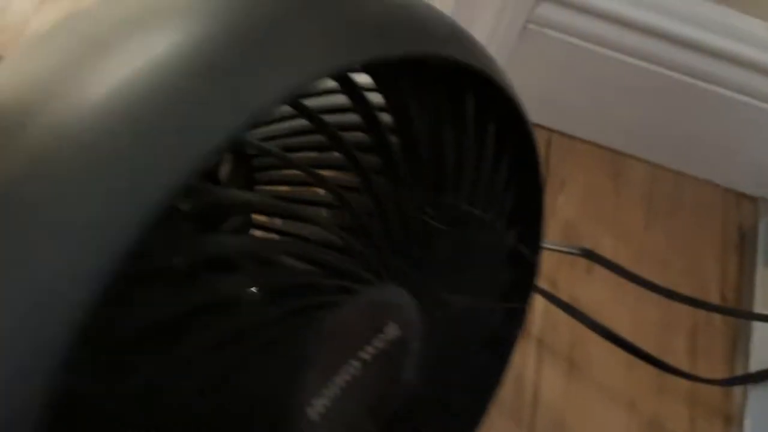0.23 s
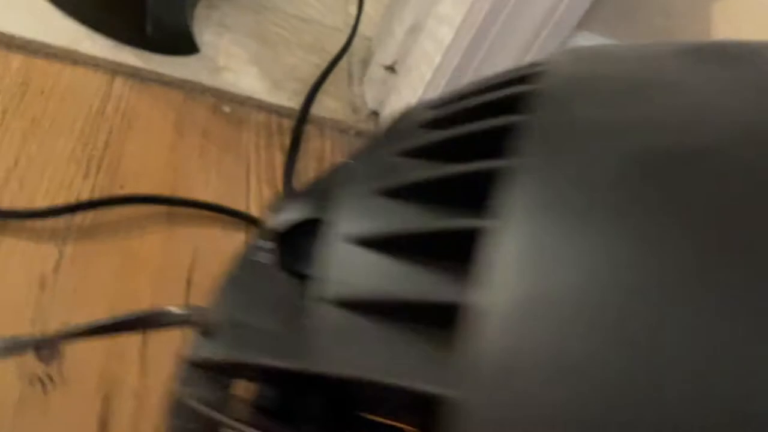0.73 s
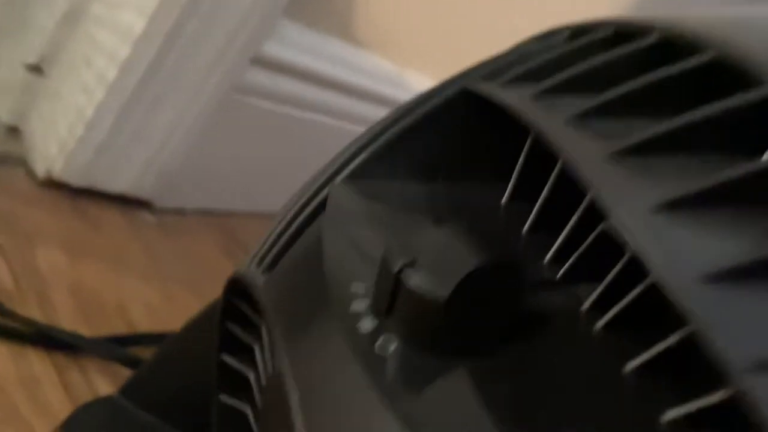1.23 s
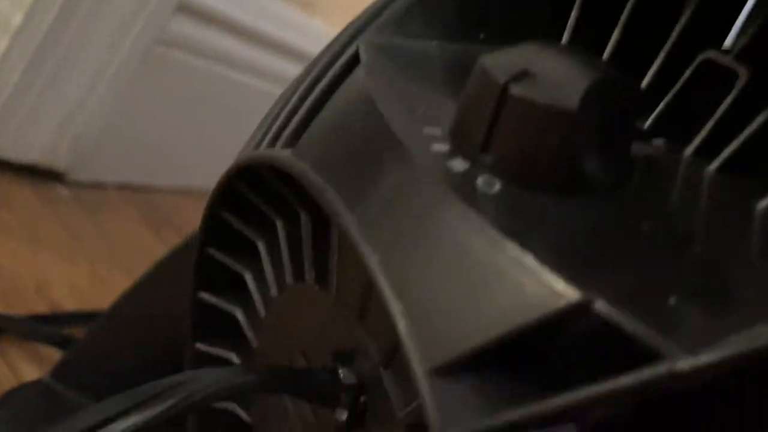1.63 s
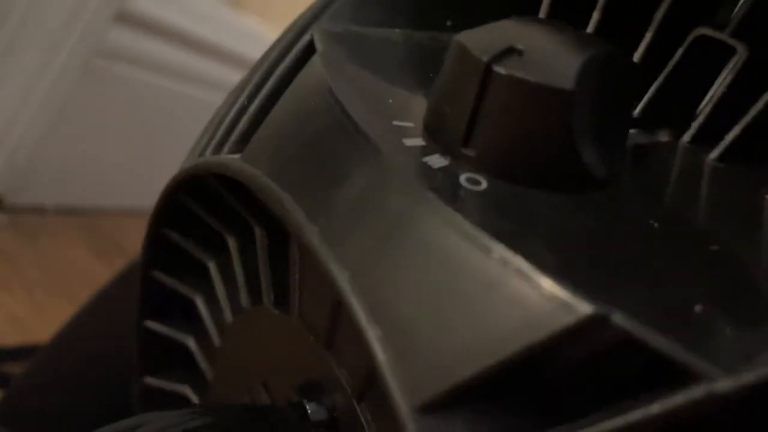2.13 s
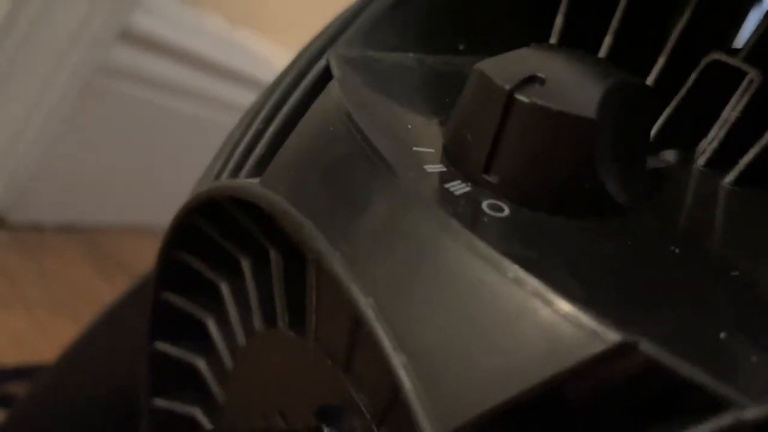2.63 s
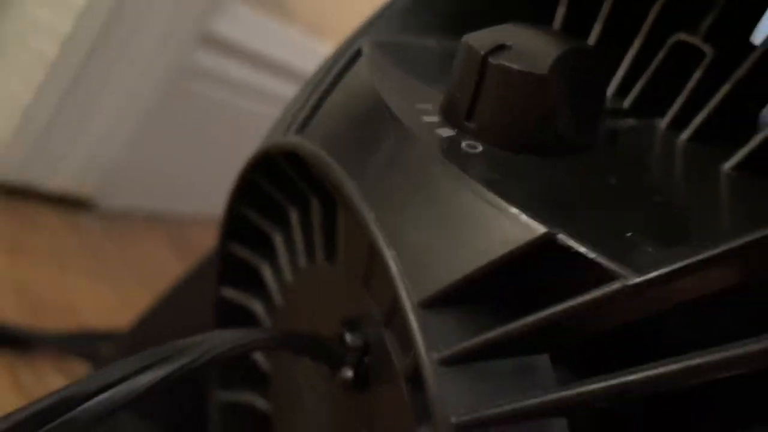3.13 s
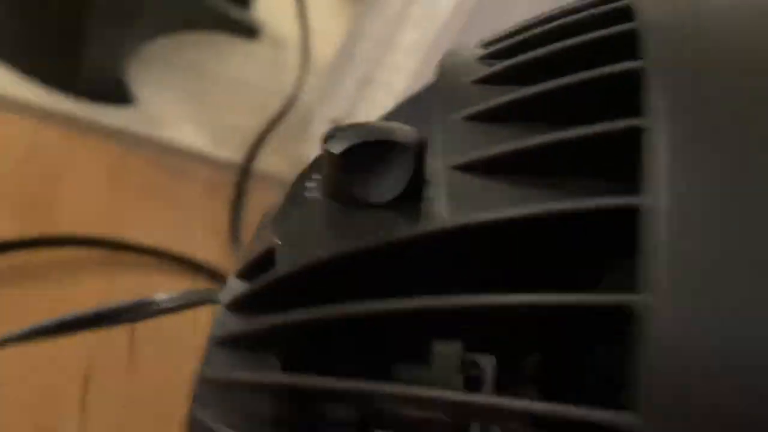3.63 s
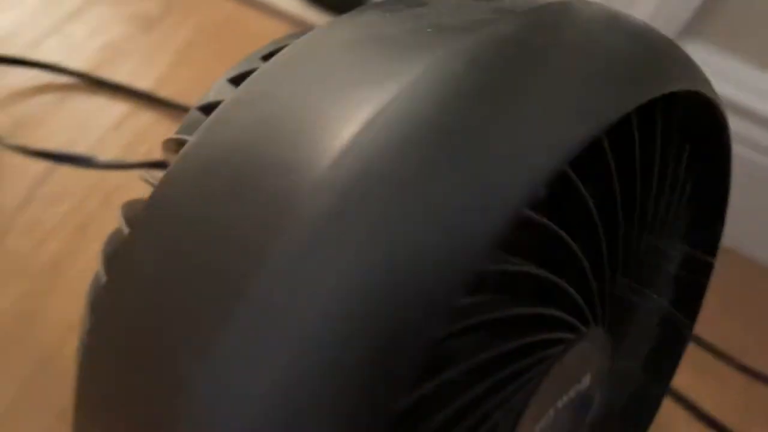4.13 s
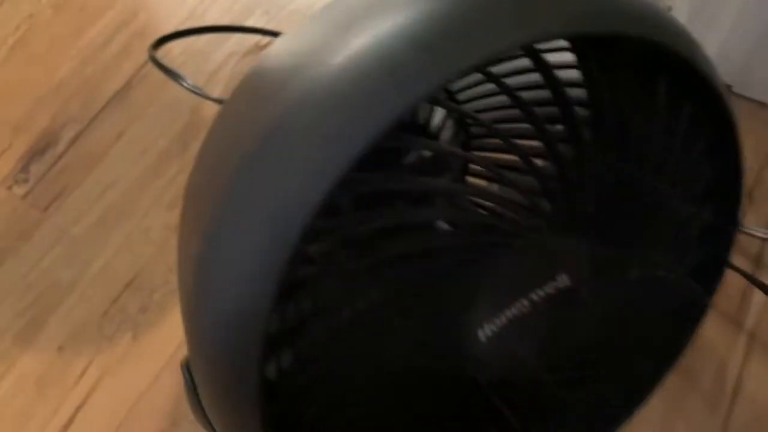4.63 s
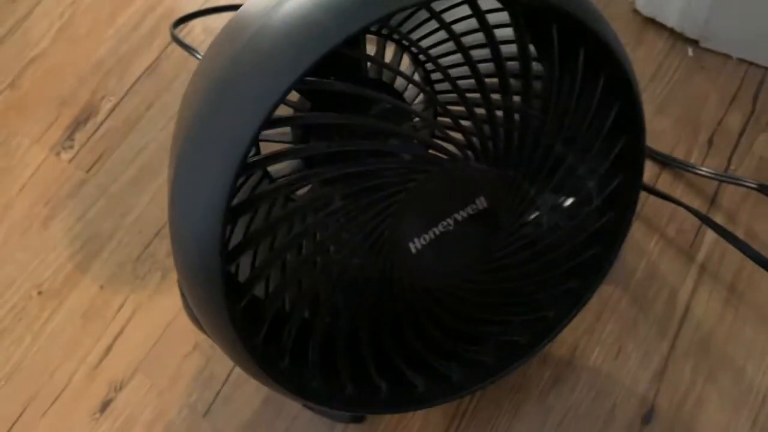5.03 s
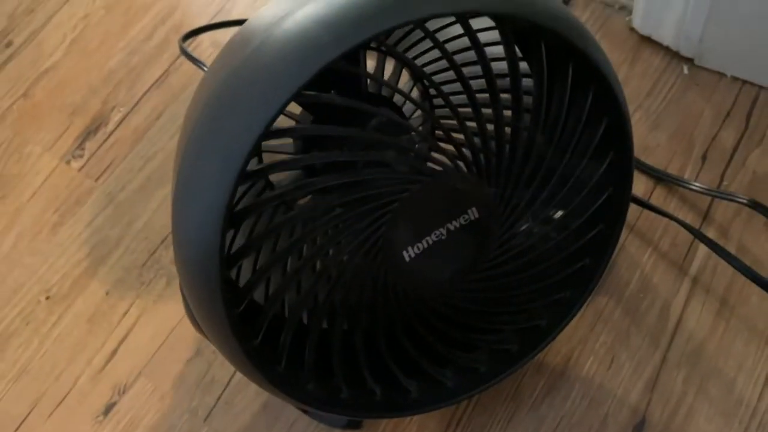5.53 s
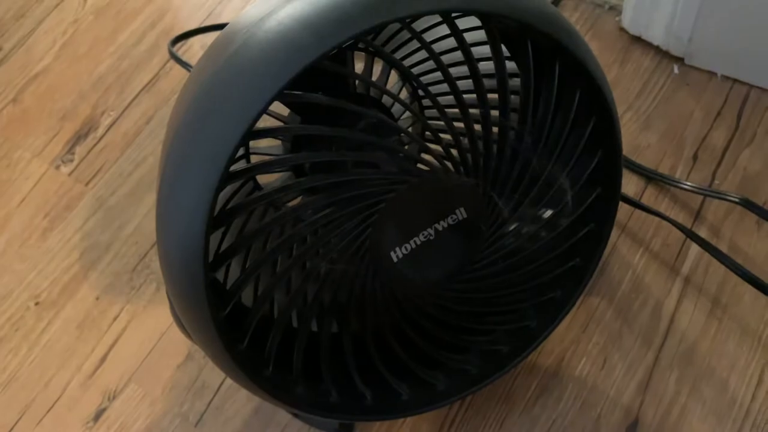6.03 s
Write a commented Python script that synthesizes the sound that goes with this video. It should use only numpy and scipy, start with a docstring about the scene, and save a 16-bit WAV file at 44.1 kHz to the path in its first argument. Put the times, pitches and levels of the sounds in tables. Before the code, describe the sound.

A small desk fan runs at constant speed indoors, heard very close in stereo. At 0 s the microphones are in front: broad airy rush, low wind buffeting fading by 0.3 s, and a hollow whistling colour. Around 0.5 s, passing the rim, the low hum almost cancels, then swells quickly, leaning left. From about 1 to 3.3 s, behind the fan, a strong deep drone near 93 Hz beats with a weaker motor hum near 120 Hz, with buzzing overtones and a fuller, finely chopped rush of air. Faint bright ticks come in spells, nearly six a second. From 3.5 s the sound thins, and the hum dips at about 3.9 s. After 4.4 s the front draught returns: breathy hiss, uneven low flutter between the ears, soft puffs and thumps, the strongest near 6.1 s, continuing to the end at 6.3 s.

```python
"""A desk fan hums and rushes as a microphone pair circles from its front to its back and returns.
Behind it the blade tone and motor hum swell: sines that flip sign, and nearly cancel, at the rim.
Grille air is coloured stereo noise, chopped at the blade rate; enveloped noise makes faint ticks.
In front, the draught buffets the microphones into their wind filter: low noise, thumps and puffs."""
import sys
import numpy as np
from scipy import signal
from scipy.fft import rfft, irfft
from scipy.io import wavfile
from scipy.ndimage import uniform_filter1d

SR = 44100
rng = np.random.default_rng(int(sys.argv[2]) if len(sys.argv) > 2 else 0)


def store_pcm(level_fs):
    """Save levels as 16-bit WAV."""
    pcm = np.round(np.clip(level_fs, -1, 1) * 32767).astype(np.int16)
    wavfile.write(sys.argv[1], SR, np.atleast_2d(pcm).T)


N = 277212
TIME = np.arange(N) / SR
BLADE_HZ, MOTOR_HZ = 93.33, 120.5
EARS = np.array([[1], [-1]])  # left, right


def amp(db):
    """Decibels to gain."""
    return 10 ** (np.asarray(db) / 20)


def curves(rows, t=TIME):
    """The columns of a time table, joined by straight lines."""
    s, *columns = np.transpose(rows)
    return np.array([np.interp(t, s, c) for c in columns])


def colour(rows, hz):
    """The columns of a spectrum table, joined on a log-frequency axis."""
    f, *columns = np.transpose(rows)
    return np.array([np.interp(np.log(hz + 1), np.log(f), c) for c in columns])


def evened(x):
    """Scales to rms 1."""
    return x / np.sqrt(np.mean(x ** 2, axis=-1, keepdims=True))


def drift(hz):
    """Random modulation of rms 1: white noise under a Gaussian low-pass of scale hz."""
    f = np.fft.rfftfreq(N, 1 / SR)
    spectrum = rfft(rng.standard_normal(N))
    return evened(irfft(spectrum * np.exp(-(f / hz) ** 2), N))


def noise(rows):
    """Noise of rms 1 with the given colour."""
    gain = amp(colour(rows, np.fft.rfftfreq(N, 1 / SR))[0])
    return evened(irfft(rfft(rng.standard_normal(N)) * gain, N))


def mix_alike(a, b, likeness):
    """Blends independent a and b into a signal of rms 1 that correlates with a by likeness."""
    return likeness * a + np.sqrt(1 - likeness ** 2) * b


def ports(x):
    """Makes two unrelated noises a close microphone pair: alike in part, out of step in the treble."""
    # (frequency [Hz], likeness [0-1], left lead [rad])
    pair = [(80, 0.81, 0.5), (332, 0.53, 0.8), (550, 0.3, 0), (785, 0.35, -.5), (1190, 0.73, 0),
            (1790, 0.93, -0.9), (3130, 0.96, 1.45), (4800, 0.78, -0.5), (5940, 0.3, 1), (6300, 1, -2),
            (7160, 1, -3.5), (8820, 0.96, -4), (10200, .95, -6.5), (12200, .95, -7.5), (13700, .95, -10)]
    likeness, lead = colour(pair, np.fft.rfftfreq(N, 1 / SR))
    likeness = np.clip(likeness, 0, 1)
    a, b = rfft(x)
    right = mix_alike(a, b, likeness) * np.exp(-1j * lead)
    return irfft(np.array([a, right]), N)


def place(t=TIME):
    """Where the microphones are: facing, share of the intake side 0-1, closeness in dB."""
    # way round the fan: (time [s], facing [-1 front, 0 rim, 1 behind], closeness to grille [dB])
    path = [(0, -1.2, -1.5), (.2, -1.15, -0.5), (.43, -0.71, -0.5), (.53, 0.0051, -1.5), (.68, 0.46, -2.5),
            (.9, 0.8, -2), (1.12, 0.62, 0.5), (1.5, 1.03, -0.5), (2, 1, 0.3), (2.9, 0.99, 0),
            (3.2, 0.95, -0.5), (3.52, 1.17, -4), (3.68, 0.9, -6), (3.78, 0.55, -4), (3.91, 0.035, -1.5),
            (4.08, -0.81, 1), (4.35, -0.89, 0.8), (5.1, -0.75, 1.9), (6.29, -0.58, 1.4)]
    facing, close_db = curves(path, t)
    return facing, np.clip(facing, 0, 1), close_db


def at_vents(t=TIME):
    """How squarely the microphones face the side vents, about 0-1."""
    # passes of the side vents: (time [s], width [s])
    passes = [(.87, 0.23), (3.53, 0.19)]
    return sum(np.exp(-((t - s) / width) ** 2) for s, width in passes)


def ticks(decay_s=0.0022, rise_s=0.00055, gain_db=4):
    """Each light touch in the fan is a bright scrape of a millisecond or two."""
    # ticks, in spells of nearly six a second: (time [s], level before gain_db and rise/decay [dB])
    touches = [(0.0897, -51), (0.264, -54), (0.4389, -53), (0.6564, -52), (0.831, -45.5), (1.0061, -48),
               (1.1807, -53), (1.355, -51), (2.2737, -50), (2.448, -49), (2.799, -47), (2.9727, -48),
               (3.1477, -49), (3.3233, -49), (3.4984, -51), (3.6737, -48.5), (3.8477, -50.5), (4.0223, -54),
               (4.4159, -55), (4.5905, -53), (4.7651, -52), (4.9402, -52), (5.023, -50), (5.8576, -57),
               (6.0317, -53)]
    # scrape spectrum: (frequency [Hz], relative level [dB])
    scrape_colour = [(1500, -26), (4000, -8), (7000, 4), (8500, -2), (10200, 1.5), (11500, -9.5),
                     (13000, -19.5), (16000, -31)]
    envelope = np.zeros(N)
    for s, db in touches:
        age = np.maximum(TIME - s, 0)
        envelope += amp(db) * (1 - np.exp(-age / rise_s)) * np.exp(-age / decay_s)
    scrape = ports(np.array([noise(scrape_colour), noise(scrape_colour)]))
    return amp(gain_db) * envelope * scrape


def draught():
    """Low wind that often presses on one microphone as it sucks at the other."""
    # wind ahead of the wind filter: (time [s], left [dB], right [dB], likeness of the ears [-1 to 1])
    wind_levels = [(0, -30, -37, 0.1), (.12, -36, -45, .3), (.3, -51, -55.5, 0), (4.2, -57, -56, 0.05),
                   (4.48, -38, -36, -0.3), (4.9, -32, -28.5, -0.6), (5.4, -35.5, -29, -0.8),
                   (5.7, -32, -32, -.1), (6.05, -31, -27, -0.13), (6.29, -36, -34, .1)]
    # wind spectrum: (frequency [Hz], relative level [dB])
    buffet_colour = [(25, -37), (48, -6.5), (72, 1), (102, 8), (130, 1.5), (165, -12.5), (220, -22),
                     (330, -31.5), (1000, -46), (3000, -64.5)]
    left_db, right_db, likeness = curves(wind_levels)
    likeness = np.clip(likeness, -1, 1)
    a, b = noise(buffet_colour), noise(buffet_colour)
    return np.array([amp(left_db) * a, amp(right_db) * mix_alike(a, b, likeness)])


def eddies():
    """Single wind thumps, too quick for the wind filter: sines under Gaussian envelopes."""
    # thumps: (time [s], left [dB], right [dB], pitch [Hz], width [s])
    thumps = [(4.36, -50, -34, 56, .028), (4.734, -40, -27, 105, 0.011), (5.135, -37, -29, 101, 0.013),
              (5.344, -39, -35, 101, 0.01), (5.955, -27, -25, 90.7, 0.018),
              (6.094, -16.5, -18, 103, 0.0067), (6.175, -29, -36, 48, .018)]
    out = np.zeros((2, N))
    for s, left_db, right_db, hz, width in thumps:
        age = TIME - s
        thump = np.exp(-(age / width) ** 2) * np.cos(2 * np.pi * hz * age)
        out -= amp([[left_db], [right_db]]) * thump
    return out


def puffs():
    """Knots of turbulence leave the front grille as short, soft puffs."""
    # puffs: (time [s], left [dB], right [dB], width [s])
    knots = [(4.475, -41, -36, .012), (4.655, -40, -33, 0.012), (4.88, -43, -33.5, .009),
             (5.155, -40, -35, .011), (5.3, -48, -36.5, 0.0099), (5.5, -44, -40, .008),
             (5.6, -44, -37, .008), (5.899, -37, -41, .01), (5.975, -31, -29.5, 0.0034)]
    # puff spectrum: (frequency [Hz], relative level [dB])
    puff_colour = [(120, -31), (330, 3.5), (600, 0), (900, -13), (2000, -25), (6000, -53)]
    envelope = np.zeros((2, N))
    for s, left_db, right_db, width in knots:
        envelope += amp([[left_db], [right_db]]) * np.exp(-((TIME - s) / width) ** 2)
    return envelope * ports(np.array([noise(puff_colour), noise(puff_colour)]))


def resonance(hz, centre_hz, width_hz):
    """Resonance curve of height 1 and the given full width."""
    return 1 / (1 + (2 * (hz - centre_hz) / width_hz) ** 2)


def air_level_db(hz, t, treble, top):
    """Rush spectrum over time: view of the fan, housing and grille resonances, whistle, closeness."""
    # base rush at the intake and the outlet: (frequency [Hz], left [dB per Hz], right [dB per Hz])
    intake = [(30.0, -85, -82), (72.5, -54, -55.5), (161, -59.5, -64), (266, -60, -63), (450.0, -63, -74),
              (690, -71, -75.5), (940, -71, -73), (1400, -73, -73.5), (1840, -79, -79.5),
              (2485, -77, -80.5), (4530, -89.5, -94.5), (10000, -102.5, -101.9), (13000.0, -109.2, -109.4),
              (15700.0, -117, -117)]
    outlet = [(30.4, -88, -86), (75, -64.5, -60), (158, -71.5, -69), (260, -71, -72.5), (447, -71, -75),
              (670, -70, -72.5), (970, -75.5, -81.5), (1340, -75, -82.5), (1750, -82.5, -87),
              (2426, -83.5, -86), (4160, -97, -101.1), (9940, -105.8, -105.4), (13000.0, -113.6, -113.7),
              (15700.0, -119, -119)]
    # change beside the rim, where lows of front and back cancel: (frequency [Hz], left [dB], right [dB])
    rim = [(45, -2.5, -1.5), (110, -6.5, -5.5), (230, 3, 2), (600, -0.5, 3), (900, -0.5, 0.5),
           (1250, -0.5, 4), (1700, -4, 0.5), (2400, -0.5, 0.5), (5000, 0.5, 0)]
    # change at the side vents: (frequency [Hz], left [dB], right [dB])
    vent_colour = [(150, 1.5, -6.5), (250, 2.5, -3), (650, -3.5, 0), (900, 3.5, 1), (1300, -0.5, -2),
                   (1700, 0, -1), (2400, 1.5, -4), (5000, -0.5, 0.5)]
    # housing and grille resonances: (frequency [Hz], width [Hz], behind [dB], in front [dB])
    grille = [(368, 30, 4, 3.5), (663, 52, 4, 2.5), (1664, 92, 3, 5.5), (2110, 170, 3.5, -1),
              (5240, 350, -3, 0), (5605, 150, 7, 7.5), (7700, 680, -3.5, 2)]
    # hollow grille whistle: (time [s], height [dB])
    whistle = [(0, 2), (.45, 8), (1, 3.5), (2.4, 4), (3.9, 2.5), (4.25, 3), (4.55, 10), (4.9, 6), (6.29, 3)]
    # whoosh below the housing shade: (time [s], level [dB])
    whoosh = [(0, 4.5), (.42, 1.5), (.7, -0.5), (1.4, 0), (2.3, 0.5), (3.2, 0.1), (3.7, -2), (4.15, 1),
              (4.7, 0), (5.25, -0.5), (6.29, -0.5)]
    # treble sizzle: (time [s], level [dB])
    sizzle_levels = [(0, 3), (.13, 8.5), (.22, 0.5), (1.35, -0.5), (1.7, 2), (2.3, -0.5), (3.55, 2),
                     (4.2, -1), (6.29, -1)]
    whistle_hz, whistle_width_hz, rim_width = 1210, 88, 0.37  # rim_width in units of facing
    facing, behind, close_db = place(t)
    at_rim = np.exp(-(facing / rim_width) ** 2)
    views = (intake, behind), (outlet, 1 - behind), (rim, at_rim), (vent_colour, at_vents(t))
    level_db = sum(colour(rows, hz[:, 0])[:, :, None] * share for rows, share in views)
    for centre_hz, width_hz, back_db, front_db in grille:
        level_db += (front_db + behind * (back_db - front_db)) * resonance(hz, centre_hz, width_hz)
    level_db += curves(whistle, t)[0] * resonance(hz, whistle_hz, whistle_width_hz)
    level_db += treble * close_db + (1 - treble) * curves(whoosh, t)[0]
    return level_db + top ** 2 * curves(sizzle_levels, t)[0]


def air(blade_cycles):
    """Grille turbulence, fuller at intake, gustier at outlet; each passing blade chops it to a rasp."""
    shade_hz, sizzle_split_hz = 765, 4330  # the housing shades waves above shade_hz
    chop, sizzle_chop, chop_sharpness = 0.13, 0.12, 0.35
    gust_db, gust_hz = 1.3, 18  # gust_db as heard behind; half as much again in front
    rasp_db, rasp_hz, sizzle_db, sizzle_hz = 0.64, 70, 1.43, 35
    frames = dict(fs=SR, nperseg=2048, noverlap=1536)
    hz, t, z = signal.stft(ports(rng.standard_normal((2, N))), **frames)
    hz = hz[:, None]
    treble = hz ** 2 / (hz ** 2 + shade_hz ** 2)
    top = hz ** 4 / (hz ** 4 + sizzle_split_hz ** 4)
    z = z * amp(air_level_db(hz, t, treble, top)) * np.sqrt(SR / 2)  # density per Hz to rms

    def band(share):
        return signal.istft(z * share, **frames)[1][:, :N]

    body, hiss, sizzle = band(1 - treble), band(treble * (1 - top)), band(treble * top)
    behind = place()[1]
    pulses = sum(chop_sharpness ** k * np.cos(2 * np.pi * (k + 1) * blade_cycles) for k in range(4))
    passing = evened(pulses) / np.sqrt(2) * (0.4 + 0.79 * behind)
    body *= amp(gust_db * (1.5 - 0.5 * behind) * drift(gust_hz))
    hiss *= amp(rasp_db * drift(rasp_hz)) * (1 + chop * passing)
    sizzle *= amp(sizzle_db * drift(sizzle_hz)) * (1 + sizzle_chop * passing)
    return body + hiss + sizzle


def tone(cycles, level_db, pan_db, lead_rad):
    """A sine in both ears, level_db in rms; the left one leads and is louder by pan_db."""
    gain = np.sqrt(2) * amp(level_db + EARS / 2 * pan_db)
    return gain * np.cos(2 * np.pi * cycles + EARS / 2 * lead_rad)


def dipole(cycles, level_db, pan_db, lead_rad):
    """A tone that pushes on one side as it pulls on the other: it flips and all but vanishes at the rim."""
    # hum that escapes cancelling at the rim, opposite in the two ears: (time [s], share)
    rim_leak = [(.53, .08), (3.91, 0.29)]
    swing = place()[0] + 1j * curves(rim_leak) * EARS
    return abs(swing) * tone(cycles + np.angle(swing) / (2 * np.pi), level_db, pan_db, lead_rad)


def blade_and_motor(blade_cycles, pan_db, lead_rad, waver_hz):
    """Blade tone and motor hum as dipoles of opposite sign, the motor off the centre of the blades."""
    # levels ahead of the dipole swing
    blade_behind_db, blade_front_db, blade_waver_db = -21.2, -33, 0.4
    motor_behind_db, motor_front_db, motor_close_share = -28, -39, 0.95
    motor_pan_db, motor_pan_share, motor_lead_rad = 2.3, 0.78, 0.77
    _, behind, close_db = place()
    near = behind ** 0.36  # behind, the microphones pass close to the rotor
    blade_db = blade_front_db + near * (blade_behind_db - blade_front_db)
    blade_db += blade_waver_db * drift(waver_hz)
    motor_db = motor_front_db + near * (motor_behind_db - motor_front_db)
    motor_db += motor_close_share * close_db
    blade = dipole(blade_cycles, blade_db, pan_db, lead_rad)
    motor_pan = motor_pan_db + motor_pan_share * pan_db
    return blade - dipole(MOTOR_HZ * TIME, motor_db, motor_pan, lead_rad + motor_lead_rad)


def hum(blade_cycles, waver_hz=7):
    """Blade tone and motor hum beat together; uneven inflow makes their overtones waver."""
    # turn of the microphone pair: (time [s], hum left minus right [dB], left lead [rad])
    heading = [(0, 3, -1.1), (.45, 3, -1.2), (.65, 10, -1.6), (1.15, 5.5, -1.4), (1.5, 0, -0.71),
               (3.05, 0, -0.81), (3.75, -1, 0.47), (4.1, -1.5, 0), (4.5, -.5, 0.17), (5.0, 4, -1.5),
               (5.45, 5, -1.7), (5.8, 2, 0.087), (6.29, 3, -0.71)]
    # overtones, sum and difference tones:
    # (blade multiple, motor multiple, behind [dB], in front [dB], left minus right [dB])
    overtones = [(2, 0, -37, -57, 0), (3, 0, -39, -57.5, 3.5), (4, 0, -47, -56.5, 4),
                 (5, 0, -53.5, -61.5, 5.5), (6, 0, -56, -61.5, 3.5), (8, 0, -59.5, -66.5, 3),
                 (10, 0, -61, -62.5, 2), (11, 0, -63, -69.5, 3.5), (13, 0, -61, -67.5, 1),
                 (0, 2, -53.5, -56, -1.5), (-1, 2, -54.5, -60.5, 1.5), (1, 1, -54, -65, 1.5)]
    # overtone strength, filling a narrow cone behind the fan: (time [s], share [0 front, 1 behind])
    buzz = [(0, 0), (.5, 0.31), (.72, 0.53), (.9, 0.78), (1.35, 1.07), (2.1, 1.035), (2.9, 0.97),
            (3.3, 0.79), (3.58, 0.87), (3.68, 0.65), (3.8, 0.16), (4, 0.19), (6.29, 0)]
    slip_rad, overtone_waver_db = 0.04, 0.8
    vent_pan_db, overtone_pan_share = 2, 0.31  # overtones lean left at the vents
    pan_db, lead_rad = curves(heading)
    behind, reach = place()[1], curves(buzz)[0]
    out = blade_and_motor(blade_cycles, pan_db, lead_rad, waver_hz)
    shared_pan_db = overtone_pan_share * pan_db * behind + vent_pan_db * at_vents()
    for blade, motor, back_db, front_db, side_db in overtones:
        level_db = front_db + reach * (back_db - front_db) + overtone_waver_db * drift(waver_hz)
        cycles = blade * blade_cycles + motor * MOTOR_HZ * TIME + rng.random()
        cycles += slip_rad * drift(waver_hz) / (2 * np.pi)
        out += tone(cycles, level_db, side_db + shared_pan_db, 0.5 + 0.11 * lead_rad)
    return out


def power(x, window_s=0.06):
    """Running mean square of each ear, smoothed over window_s and again over half of it."""
    size = round(window_s * SR)
    smooth = uniform_filter1d(uniform_filter1d(x ** 2, size), size // 2)
    return abs(smooth) + 1e-12


def wind_filter(tones, wind, ceiling_db=-31, trigger_share=0.1):
    """Where wind is enough of the bass, each ear is held at a ceiling: even level, broken hum."""
    bass = tones + wind
    engaged = np.minimum(power(wind) / power(bass) / trigger_share, 1)
    over_db = np.maximum(10 * np.log10(power(bass)) - ceiling_db, 0)
    return bass * amp(-engaged * over_db)


def scene():
    """The rotor turns almost evenly and drives both the hum and the chopping of the air."""
    blade_cycles = np.cumsum(BLADE_HZ + 0.066 * drift(1.69)) / SR
    bass = wind_filter(hum(blade_cycles), draught())
    return ticks() + eddies() + puffs() + air(blade_cycles) + bass


def record(dry, edge_hz=15750):
    """The band limit of the recorder: a linear-phase low-pass."""
    taps = signal.firwin(511, edge_hz, window=("kaiser", 9), fs=SR)
    return signal.oaconvolve(dry, taps[None], "same")


dry = scene()
out = record(dry)
store_pcm(out)
```